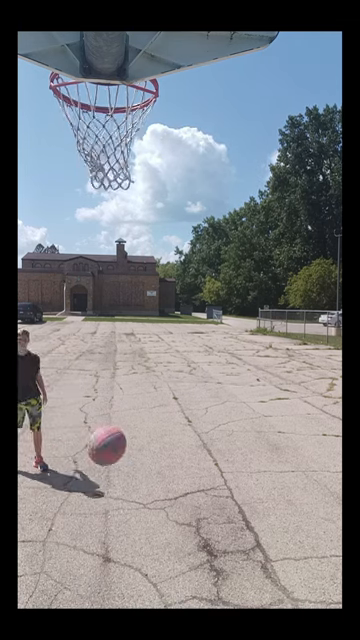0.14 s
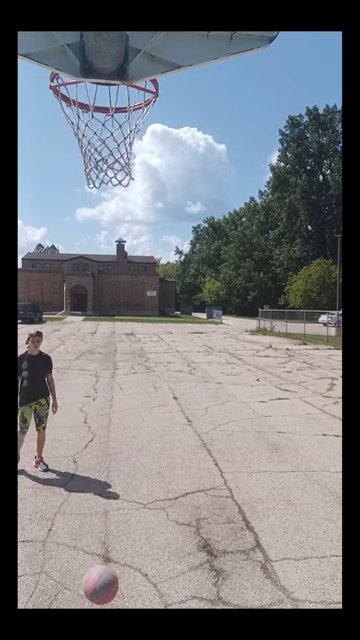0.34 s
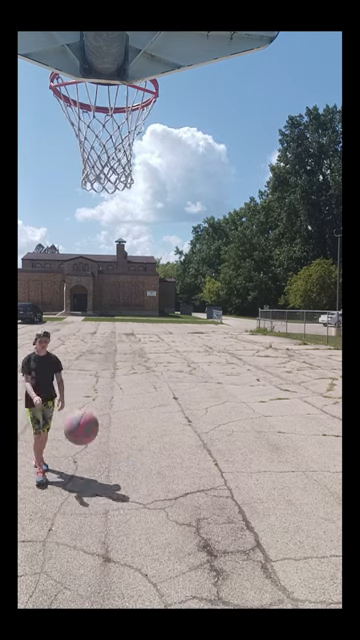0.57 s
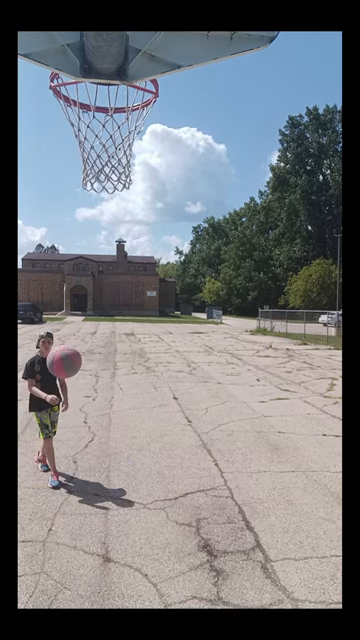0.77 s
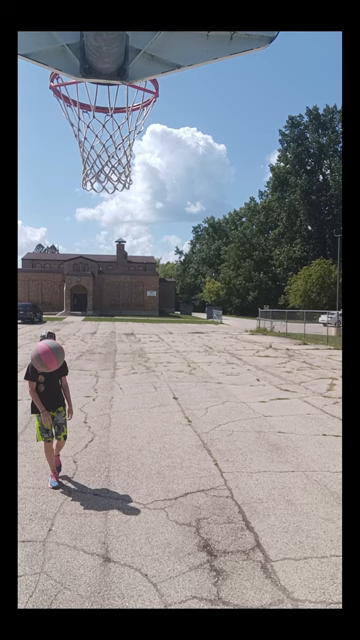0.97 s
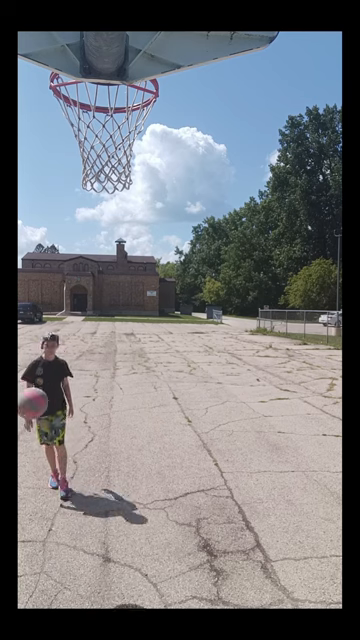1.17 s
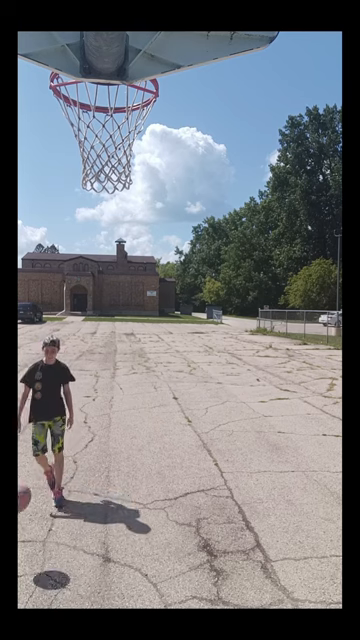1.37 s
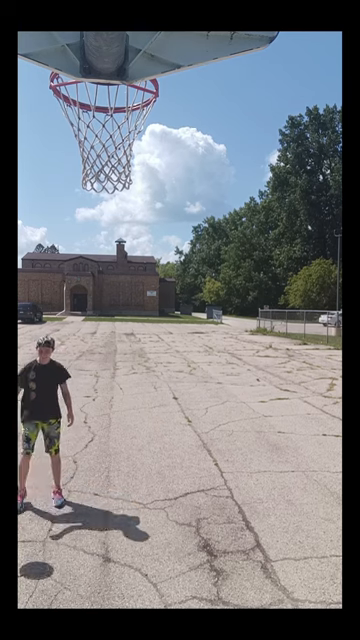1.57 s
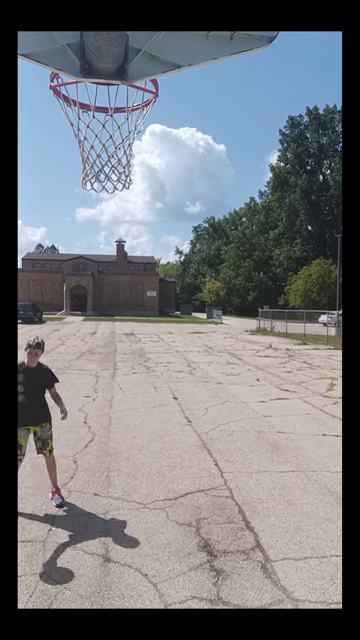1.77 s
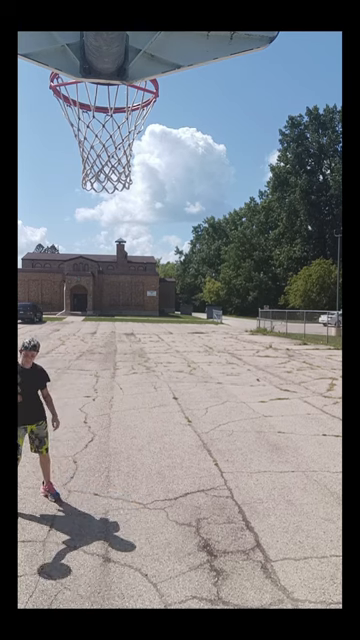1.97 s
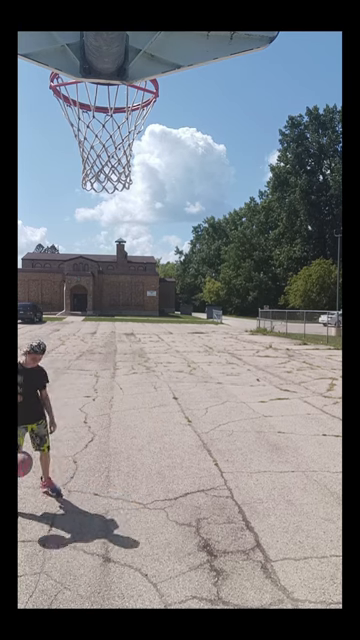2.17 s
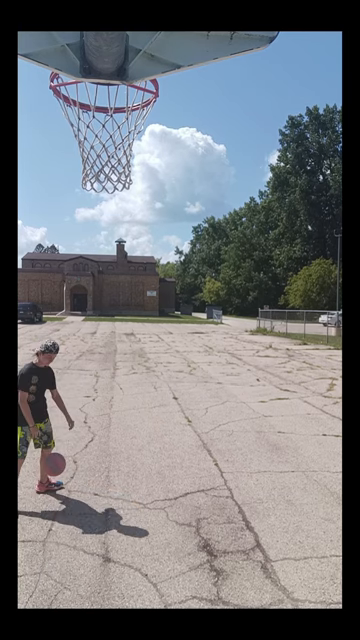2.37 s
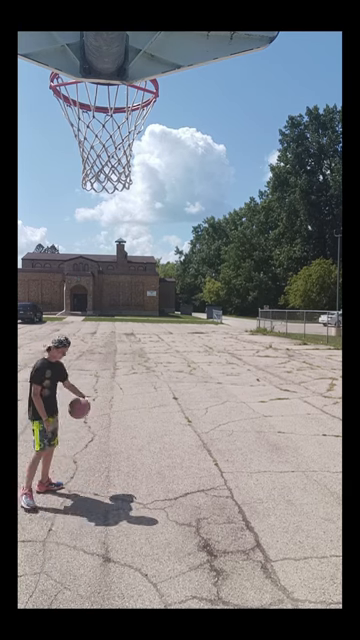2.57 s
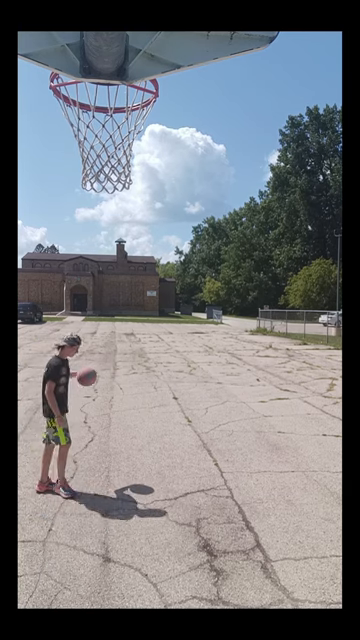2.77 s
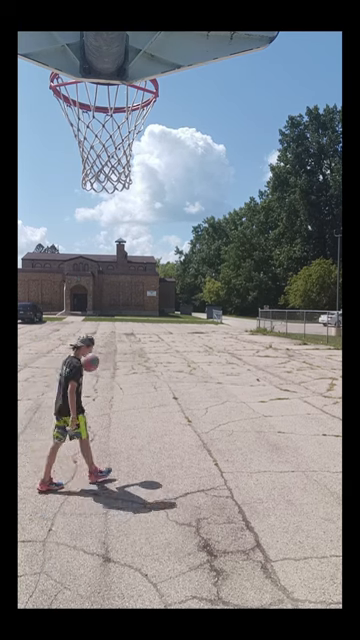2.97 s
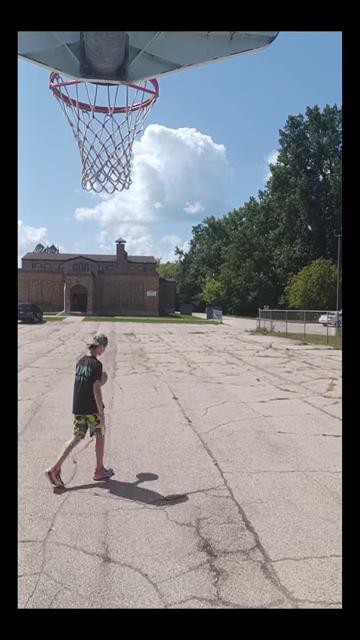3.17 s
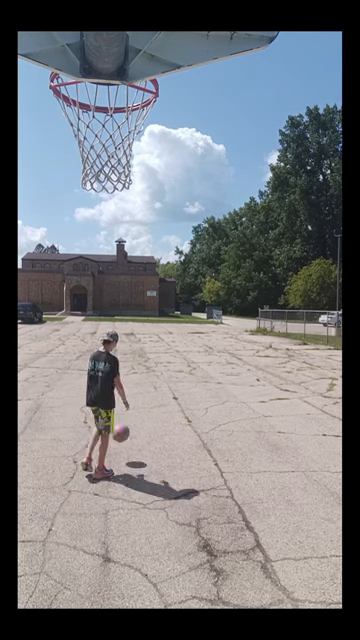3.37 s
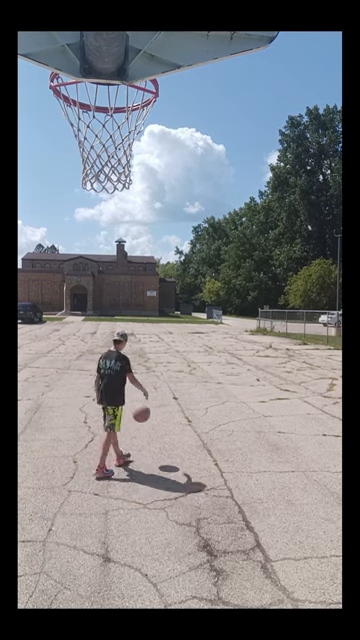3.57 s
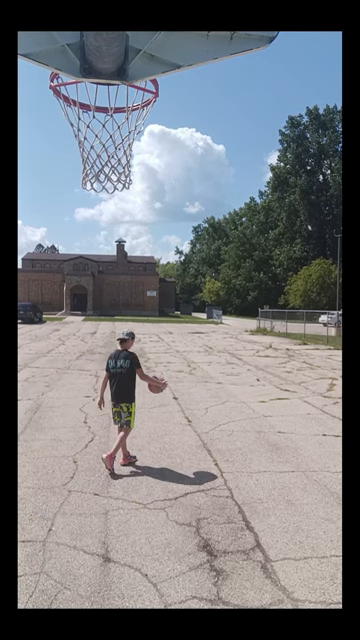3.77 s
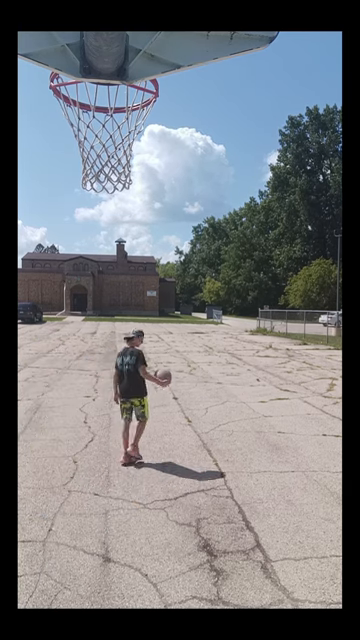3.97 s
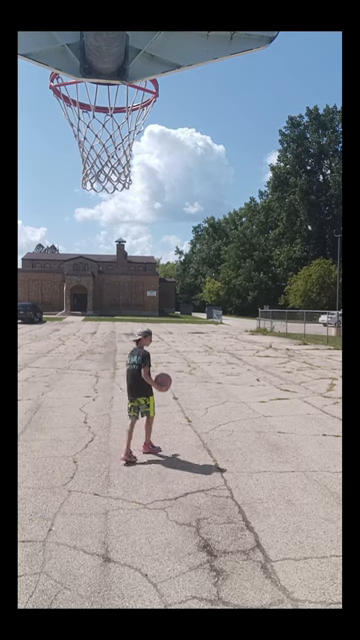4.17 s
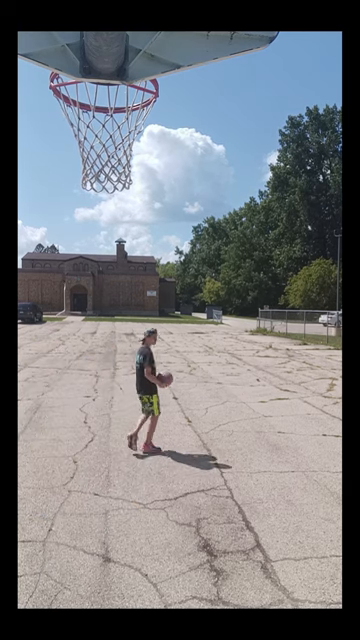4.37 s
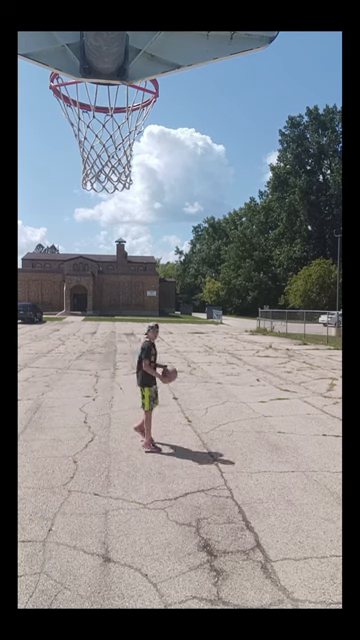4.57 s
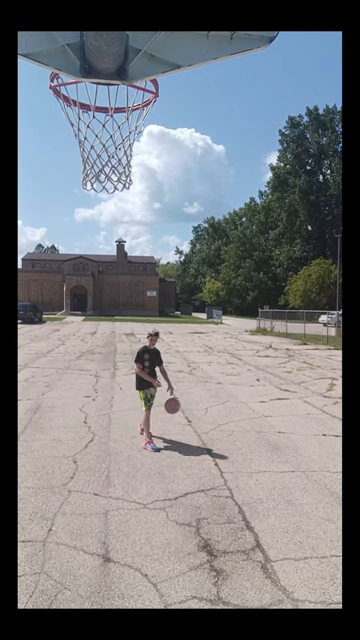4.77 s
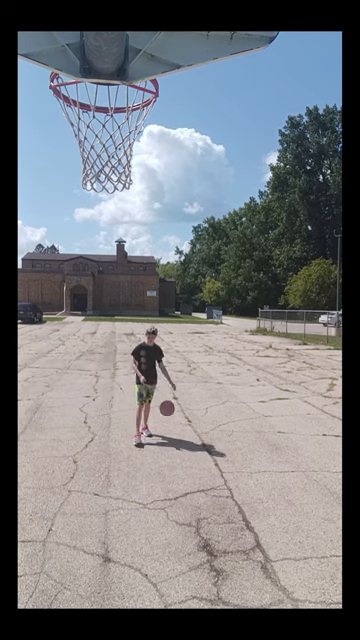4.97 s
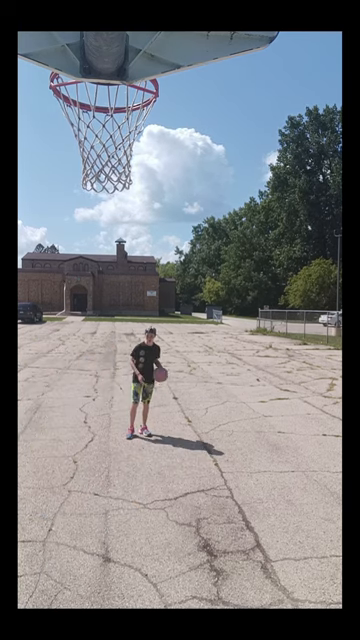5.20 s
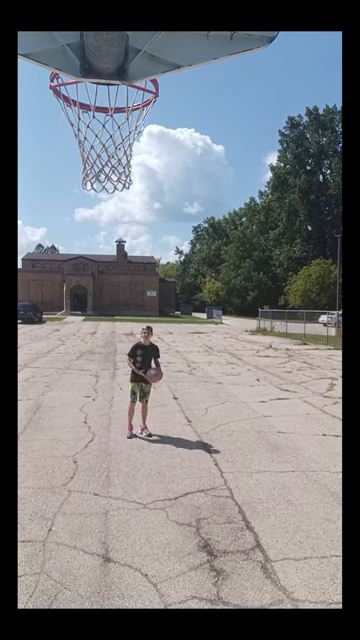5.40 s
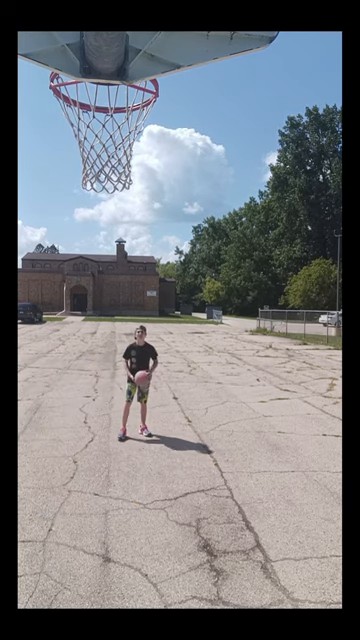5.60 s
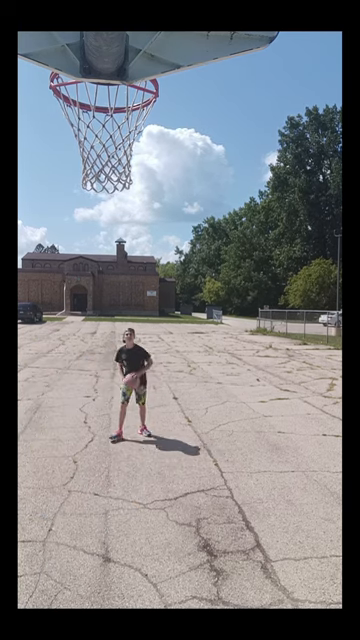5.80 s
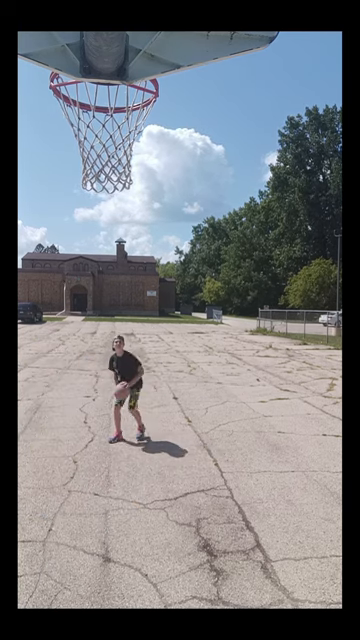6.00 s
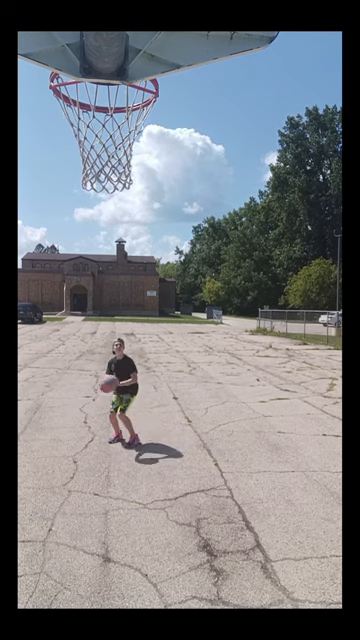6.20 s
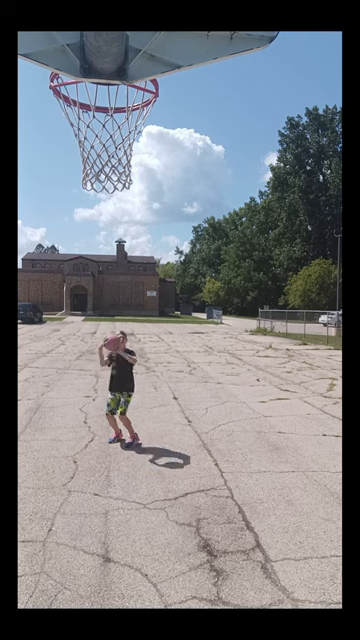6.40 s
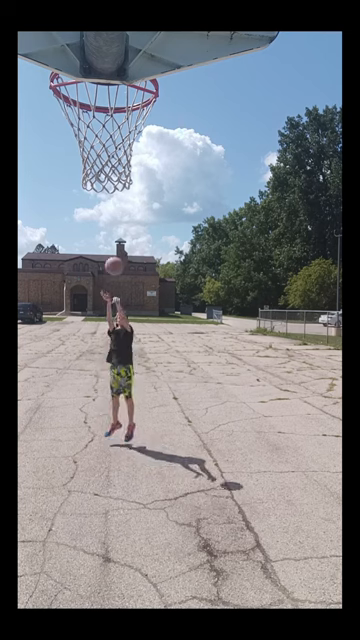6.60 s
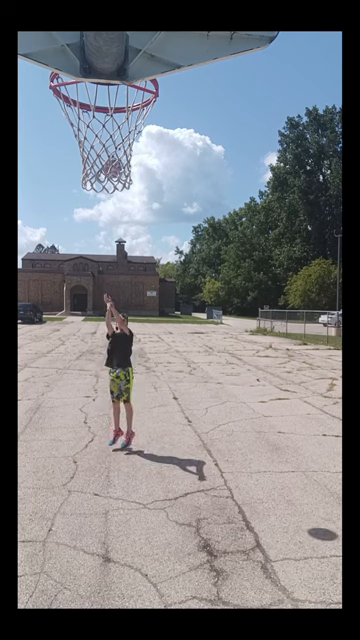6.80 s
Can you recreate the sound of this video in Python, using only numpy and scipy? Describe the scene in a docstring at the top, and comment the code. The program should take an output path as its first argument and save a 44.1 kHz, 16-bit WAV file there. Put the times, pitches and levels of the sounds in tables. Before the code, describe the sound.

An outdoor asphalt court heard in stereo from under the hoop, with far low rumble and a high hiss that slowly thins. At 0.2 s a basketball lands with a hard rubbery slap, short low thump, and scattered echoes from pavement, trees and a distant building; a thin fading ring follows. Heavy wind bursts batter the left side around 0.5-0.6 s and 1.1 s. A scuff precedes the second bounce at 1.4 s, and a tick and scrape follow near 1.55 s. The third, strongest bounce hits at 2.2 s; wind thuds at 2.6-2.7 s. A softer bounce comes at 3.4 s, a dull hand knock at 4.3 s, gritty steps around 4.5-5.1 s, and the fifth bounce at 4.8 s. Gusts return near 6 s with a sharp scuff and tiny sole squeak at 6.07 s, then a quick double knock with ticks at 6.8 s.

```python
"""A basketball bounces five times on an open asphalt court, heard from under the hoop: each bounce
slaps the ringing rubber shell, thumps, and draws an answer from the yard, trees and a far building.
Damped noise gives dull knocks, mostly hands on the ball; shoes scuff grit, tick, and squeak by stick and slip.
Eddies swept past the two microphone ports buffet them, over shaped noise: a distant rumble and a high hiss."""
import sys
import numpy as np
from scipy import signal
from scipy.fft import rfft, irfft, next_fast_len
from scipy.io import wavfile
from scipy.ndimage import uniform_filter1d, map_coordinates

SR = 44100
rng = np.random.default_rng(int(sys.argv[2]) if len(sys.argv) > 2 else 0)


def wrap_up_sound(samples):
    """Save the sound to the file named by the first command line argument, as 16-bit audio."""
    columns = np.atleast_2d(samples).T
    # keep every value between -1 and 1, then stretch to whole-number steps
    tamed = np.clip(columns, -1, 1)
    steps = np.round(tamed * 32767).astype(np.int16)
    wavfile.write(sys.argv[1], SR, steps)


N = 302092

# crunch of grit under a sole: frequency_hz, density_db (relative, per Hz)
GRIT_SPECTRUM = [(300, -23), (900, -4), (1600, 3), (2400, 5), (3200, 5), (4200, -0.5), (6000, -3),
                 (9000, -14), (15000, -15.5)]
# turbulence: knots per second of the fast flutter in the wind's level and pitch
FLUTTER_PER_S = 105


def amp(db):
    """Decibels to gain."""
    return 10 ** (np.asarray(db) / 20)


def unit(x):
    """x at rms 1."""
    return x / np.sqrt(np.mean(x ** 2) + 1e-20)


def along(points, hz):
    """(Hz, value) points read on a log axis."""
    f, v = np.transpose(points)
    return np.interp(np.log(hz + 1), np.log(f + 1), v)


def curve(rows, order=1):
    """One column of (s, ..) rows as a value per sample."""
    columns = np.transpose(rows)
    return np.interp(np.arange(N) / SR, columns[0], columns[order])


def filtered(x, response):
    """x times a complex response of frequency."""
    n = x.shape[-1]
    m = next_fast_len(n + SR // 10, True)
    return irfft(rfft(x, m) * response(np.fft.rfftfreq(m, 1 / SR)), m)[..., :n]


def causal(db):
    """The minimum-phase response with these gains."""
    cepstrum = irfft(db * np.log(10) / 20)
    half = len(cepstrum) // 2
    cepstrum[1:half] *= 2
    cepstrum[half + 1:] = 0
    return np.exp(rfft(cepstrum))


def resonance(f, hz, width):
    """One damped mode, gain 1 at its centre."""
    return 1j * f * width / (hz * hz - f * f + 1j * f * width)


def treble(f, db, corner_hz=2600):
    """A shelf that lifts the highs by db."""
    return 1 + (amp(db) - 1) * f ** 2 / (f ** 2 + corner_hz ** 2)


def wobble(rate):
    """A random curve with rate knots a second, repeating after 2048 knots."""
    return map_coordinates(rng.standard_normal(2048), [np.arange(N) * rate / SR], mode="wrap")


def brief(t, length_s):
    """An envelope that holds for about length_s and then stops quickly."""
    return np.exp(-np.square(np.square(t / length_s)))


def held(t, length_s, rise_s, fall_s):
    """An envelope that rises around t = 0, holds for length_s and falls away."""
    return (1 + np.tanh(t / rise_s)) * (1 - np.tanh((t - length_s) / fall_s)) / 4


def specks(shape, per_s=700, bed_db=-7):
    """Scattered impulses of random size on a bed of weaker ones."""
    sparse = rng.standard_normal(shape) * (rng.random(shape) < per_s / SR)
    return unit(unit(sparse) + amp(bed_db) * rng.standard_normal(shape))


def add(track, s, sound):
    """Mix a sound into a track at time s."""
    start = round(s * SR)
    track[..., start:start + sound.shape[-1]] += sound[..., :N - start]


def at_ports(x, s, lag_s=0.000592, lag_growth_s_per_s=0.000036):
    """The right port hears the court first, by more as the player works his way across it."""
    lag = lag_s + lag_growth_s_per_s * s
    return filtered(x, lambda f: np.exp(1j * np.pi * f * lag * np.array([[-1], [1]])))


def noise(spectrum, patchy_db):
    """Unrelated noise of rms 1 in both channels, with shared narrow drifting patches of gain."""
    z = signal.stft(rng.standard_normal((2, N)), nperseg=1024)[2]
    field = uniform_filter1d(rng.standard_normal(z.shape[1:]), size=4, axis=0)
    field = uniform_filter1d(field, size=22, axis=1)
    patchy = signal.istft(z * amp(patchy_db * unit(field)), nperseg=1024)[1][:, :N]
    return unit(filtered(patchy, lambda f: amp(along(spectrum, f))))


def background(hiss_db=2, distance_db=-57.5, drift_db=.5):
    """High hiss and the far rumble of the neighbourhood, each drifting a little in level."""
    # high hiss: frequency_hz, density_db (relative, per Hz)
    hiss_spectrum = [(1500, -6.5), (3000, -4.5), (5000, 0), (7000, 4.5), (8300, 5.5), (10400, 0.5),
                     (12000, -10.5), (13500, -23), (16000, -33.5)]
    # far traffic and trees: frequency_hz, density_db (relative, per Hz)
    distance_spectrum = [(30, 9.5), (200, -9), (350, -1), (520, -25), (720, -1.5), (950, -3), (1400, -9.5),
                         (2200, -15), (4000, -17), (8000, -53), (14000, -54)]
    # slow course of the hiss: time_s, level_db (before hiss_db and the drift)
    hiss_level = [(0, -49.5), (.3, -49.5), (1.9, -53.5), (4.6, -55.5), (5.8, -58.5), (6.85, -56)]
    hiss = noise(hiss_spectrum, patchy_db=2.8)
    distance = amp(distance_db + drift_db * wobble(13.0)) * noise(distance_spectrum, patchy_db=5.0)
    return amp(curve(hiss_level) + hiss_db + drift_db * wobble(4.3)) * hiss + distance


def buffet(level_db, shift, octaves_per_db=0.0532, moderate_db=-23, gain_db=1, flicker_octaves=.13):
    """Wind sweeps a pattern of eddies past one port: the faster it goes, the louder and higher they sound."""
    # eddies in a moderate gust: frequency_hz (at speed 1), density_db (relative, per Hz)
    eddy_spectrum = [(12, -28), (25, -26), (45, 4), (75, 1.5), (115, 1), (170, -5), (250, -12.5),
                     (370, -25), (540, -47.5), (800, -73), (1500, -60), (4000, -110)]
    octaves = octaves_per_db * (level_db - moderate_db) + shift
    speed = 2 ** (octaves + flicker_octaves * wobble(FLUTTER_PER_S))
    travel = np.cumsum(speed)
    pattern = filtered(rng.standard_normal(2 * N), lambda f: amp(along(eddy_spectrum, f)))
    eddies = map_coordinates(pattern, [travel], mode="wrap")
    # level the swept pattern, so that level_db alone sets the loudness
    power = uniform_filter1d(uniform_filter1d(eddies ** 2, size=1100), size=700)
    even = eddies / np.sqrt(np.abs(power) + 1e-20)
    return amp(uniform_filter1d(level_db, size=300) + gain_db) * even


def wind_at(port, breeze_db, breeze_octaves=-.1, rise_s=0.00433, fall_s=0.0111,
            skirt_db=-15, skirt_rise_s=.025, skirt_fall_s=.04,
            swell_db=1.44, swell_per_s=16, flutter_db=2.5):
    """Gusts ride on the breeze at one port; the strongest dominates the pitch, and turbulence shakes the sum."""
    # gusts that strike one port; small eddies sound higher. Levels precede turbulence and buffet gain:
    # start_s, length_s, level_db, pitch_shift_octaves, port
    gust_rows = [(0, 0.23, -24, 0.17, "left"), (0.076, 0.048, -23.5, 0.43, "right"),
                 (0.161, 0.014, -21.5, 0.36, "right"), (0.509, 0.019, -21, -0.026, "left"),
                 (0.522, 0.028, -9, 0.45, "left"), (0.569, 0.022, -10, 0.26, "left"),
                 (0.638, 0.14, -22.5, 0.12, "left"), (0.704, 0.013, -16.5, -0.13, "left"),
                 (0.826, 0.058, -22, -0.26, "left"), (0.916, 0.073, -17, -0.057, "left"),
                 (1.069, 0.037, -10.5, -0.35, "left"), (1.125, 0.053, -12.5, 0.26, "left"),
                 (1.227, .11, -21, -0.18, "left"), (1.686, 0.18, -26, -0.19, "right"),
                 (1.778, 0.034, -20, -0.0033, "left"), (1.909, 0.16, -23, -0.039, "left"),
                 (2.304, 0.062, -21, -0.21, "right"), (2.574, 0.07, -17.5, 0.13, "left"),
                 (2.63, .11, -19, 0.35, "left"), (2.734, 0.033, -17, -0.0061, "left"),
                 (2.764, 0.036, -14.5, 0.19, "left"), (2.819, 0.094, -24.5, 0.046, "left"),
                 (2.922, 0.06, -19, -0.043, "left"), (3.156, 0.021, -15.5, -0.12, "left"),
                 (3.757, 0.06, -25.5, 0.15, "left"), (4.053, 0.047, -19.5, -0.12, "left"),
                 (5.207, 0.079, -15.5, -0.16, "left"), (5.266, 0.015, -15, 0.32, "left"),
                 (5.558, 0.048, -22.5, 0.0044, "right"), (5.799, 0.038, -20.5, -0.16, "right"),
                 (5.82, 0.48, -20.5, -0.075, "left"), (5.938, 0.072, -13, -0.41, "left"),
                 (5.889, 0.048, -18, 0.046, "left"), (6.089, 0.025, -13.5, 0.22, "left"),
                 (6.14, 0.026, -13.5, 0.28, "left"), (6.494, 0.046, -26.5, 0.17, "left"),
                 (6.343, 0.036, -14.5, 0.063, "left"), (6.567, 0.09, -19, -0.18, "right"),
                 (6.699, 0.016, -13.5, 0.36, "left"), (6.734, 0.021, -14.5, 0.34, "left"),
                 (6.737, 0.15, -26, -0.055, "right"), (6.804, 0.083, -20, -0.3, "left")]
    t, power = np.arange(N) / SR, amp(breeze_db) ** 2
    shift = breeze_octaves * power
    for s, length, db, octaves, side in gust_rows:
        if side == port:
            near = np.abs(t - s - length / 2) < length / 2 + .1
            since = t[near] - s
            gust = (amp(db) * held(since, length, rise_s, fall_s)) ** 2
            # a weaker, slower swell of air before and after the gust
            skirt_length = length + skirt_rise_s + skirt_fall_s
            skirt = held(since + skirt_rise_s, skirt_length, skirt_rise_s, skirt_fall_s)
            power[near] += gust + (amp(db + skirt_db) * skirt) ** 2
            shift[near] += octaves * gust
    swell = swell_db * np.tanh(wobble(swell_per_s))
    flutter = flutter_db * np.tanh(wobble(FLUTTER_PER_S))
    return buffet(10 * np.log10(power) + swell + flutter, shift / power)


def wind(limit=.8):
    """Each port has its own turbulence, rounded off at the peaks; the windward left one takes most of the gusts."""
    # light breeze between gusts, before turbulence and buffet gain: time_s, left_level_db, right_level_db
    breeze = [(0, -28, -26), (.4, -37, -30), (.8, -27, -32), (1.55, -33, -33), (2.1, -27, -28.5),
              (2.8, -27, -30.5), (3.4, -33, -32), (4.25, -39, -36), (4.75, -42, -39), (5.5, -35.5, -37),
              (6.15, -30, -27.5), (6.85, -32, -28)]
    left = wind_at("left", curve(breeze, order=1))
    right = wind_at("right", curve(breeze, order=2))
    return limit * np.tanh(np.array([left, right]) / limit)


def thuds(width_s=0.00099, suction_ratio=2.65):
    """A tight eddy slams into the left port: one push of pressure inside a wider, weaker suction."""
    # slams: centre_s, peak_db (full scale 0, ahead of the port's colour)
    slams = [(.077, -10), (0.5294, -4), (0.5454, -4), (.5715, -3.5), (.578, -5.5), (1.143, -9.5),
             (2.621, -0.5), (2.671, -10.5), (2.695, -9.5), (2.72, -12), (3.17, -9), (5.736, -19.5),
             (5.982, -5.5), (6.11, -5.5), (6.201, -13)]
    out, t = np.zeros((2, N)), np.arange(-SR // 50, SR // 50) / SR
    pressure = np.cosh(t / width_s) ** -2
    suction = np.cosh(t / width_s / suction_ratio) ** -2 / suction_ratio
    push = pressure - suction
    for s, db in slams:
        add(out[0], s + t[0], amp(db) * push / push.max())
    return out


def squeak(start_s=6.068, length_s=0.025, pitch_hz=2580, level_db=-39, rough=0.028, overtone_db=-11):
    """A planted rubber sole sticks and slips at an unsteady rate: a rough chirp with weak overtones."""
    t = np.arange(N) / SR - start_s
    phase = 2 * np.pi * np.cumsum(pitch_hz * (1 + rough * wobble(820))) / SR
    tone = sum(amp(k * overtone_db) * np.sin((k + 1) * phase) for k in range(3))
    chirp = amp(level_db) * unit(tone) * held(t, length_s, rise_s=0.0019, fall_s=0.0083)
    return at_ports(chirp, start_s)


def ticks(width_share=0.13, crack_db=-17, snap_s=0.0018, pan_db=3):
    """Short ticks of heel, grit and hand: a broad crack with a brief ring at its own pitch."""
    # single ticks: start_s, level_db (before the pan), pitch_hz
    tick_rows = [(1.557, -26, 2590), (4.5505, -33.5, 2632), (4.5982, -41, 2562), (4.6178, -38.5, 3793),
                 (4.6952, -44, 3916), (4.9895, -40.5, 2463), (5.0214, -42, 2570), (5.1263, -38.5, 2703),
                 (6.789, -41, 3902), (6.8024, -39, 6570)]
    out, t = np.zeros((2, N)), np.arange(SR // 20) / SR
    push = t / snap_s * np.exp(1 - t / snap_s)
    for s, db, hz in tick_rows:
        colour = lambda f: resonance(f, hz, width_share * hz) + amp(crack_db + along(GRIT_SPECTRUM, f))
        snap = filtered(push * rng.standard_normal(len(t)), colour)
        add(out, s, at_ports(amp(db) * snap * np.linalg.norm(push) / np.linalg.norm(snap), s))
    return out * amp([[pan_db], [-pan_db]])


def scuffs(grain_db=4, stutter_db=1, rise_s=0.0067, fall_s=0.022, fade_db=3, pan_db=3.5):
    """A sole scrapes over loose grit: a dense run of tiny grains, each with its own size and pitch."""
    # dragging soles: start_s, level_db (before stutter, fade and pan), length_s, half_treble_lift_db
    drags = [(1.156, -48.5, 0.047, 2), (1.555, -39, 0.04, 2), (3.874, -62, 0.028, 18),
             (4.543, -46.5, 0.07, -7), (4.605, -44.5, 0.068, 10.5), (4.967, -50, 0.063, 27),
             (4.988, -43, 0.13, 0), (5.069, -46, 0.11, -5), (6.071, -31.5, 0.023, 1),
             (6.413, -54, 0.026, 17), (6.799, -47, 0.046, 2)]
    out, t = np.zeros((2, N)), np.arange(-SR // 25, SR // 4) / SR
    for s, db, length, half_lift_db in drags:
        z = signal.stft(specks(len(t)), nperseg=128)[2]
        sizes = unit(uniform_filter1d(rng.standard_normal(z.shape), size=4, axis=0))
        crunch = signal.istft(z * amp(grain_db * sizes), nperseg=128)[1][:len(t)]
        colour = lambda f: amp(along(GRIT_SPECTRUM, f)) * treble(f, 2 * half_lift_db, corner_hz=6650)
        grains = filtered(crunch, colour)
        stutter = stutter_db * unit(uniform_filter1d(rng.standard_normal(len(t)), size=400))
        drag = amp(db + stutter - fade_db * t / length) * held(t, length, rise_s, fall_s)
        add(out, s + t[0], at_ports(drag * unit(grains), s))
    return out * amp([[pan_db], [-pan_db]])


def knocks(width_share=0.28, gain_db=7, soft_hz=1600):
    """Short dull knocks of damped noise: hands on the ball, and at 2.617 s the upper edge of a wind thud."""
    # knocks: start_s, level_db (before gain_db), pitch_hz, burst_t60_s
    knock_rows = [(2.617, -34, 1200, 0.02), (4.2766, -23, 1201, 0.039), (4.283, -22, 429.9, 0.1),
                  (6.789, -13.5, 1291, 0.021), (6.801, -22, 1520, 0.076), (6.825, -32, 1340, .025)]
    out, t = np.zeros((2, N)), np.arange(SR // 10) / SR
    for s, db, hz, t60 in knock_rows:
        burst = amp(-60 * t / t60) * rng.standard_normal(len(t))
        knock = filtered(burst, lambda f: resonance(f, hz, width_share * hz) / (1 + 1j * f / soft_hz) ** 2)
        add(out, s, at_ports(amp(db + gain_db) * knock / np.linalg.norm(knock), s))
    return out


def singing(spin_hz=8, spin_db=2.0, fade_db_per_s=25, rise_s=0.011, fall_s=0.025, waver=0.0054):
    """After a bounce the air in the flying ball sings a thin tone, wavering with its spin as it fades."""
    # air modes: start_s, length_s, pitch_hz, level_db (at the start, before the spin)
    tones = [(0.3, 0.25, 2213, -44.5), (0.338, .18, 883, -60), (3.544, 0.04, 2961, -59),
             (3.67, 0.15, 2961, -60)]
    out, t = np.zeros((2, N)), np.arange(-SR // 20, SR // 2) / SR
    for s, length, hz, db in tones:
        spin = spin_db * np.sin(2 * np.pi * spin_hz * t)
        level = amp(db - fade_db_per_s * t + spin) * held(t, length, rise_s, fall_s)
        phase = 2 * np.pi * np.cumsum(hz * (1 + waver * wobble(76)[:len(t)])) / SR
        add(out, s + t[0], at_ports(level * np.sin(phase), s))
    return out


def yard(x, echo_s, near_db=-23, swell_s=0.022, trees_s=0.04, trees_db=-29, trees_t60=0.34,
         trees_onset_s=0.0093, far_db=-33, far_t60=0.23, far_onset_s=.004, air_db=9, grain_db=3, patchy_db=4):
    """Uneven scatter from the pavement swells and dies; the nearest trees and a far building return soft echoes."""
    # decay of the pavement scatter: frequency_hz, t60_s
    decay = [(200, 0.46), (1200, 0.52), (3000, 0.5), (7000, 0.53), (14000, 0.11)]
    hz, t, z = signal.stft(specks((2, len(x)), per_s=2500), SR, nperseg=256)
    field = uniform_filter1d(rng.standard_normal(z.shape[1:]), size=2, axis=0)
    patches = unit(uniform_filter1d(field, size=10, axis=1))
    z = z * amp(grain_db * rng.standard_normal(len(t)) + patchy_db * np.tanh(patches))

    def echo(s, t60, onset_s):
        return (1 + np.tanh((t - s) / onset_s)) * amp(-60 * np.abs(t - s) / t60)

    scatter = (1 - np.exp(-t / swell_s)) * amp(-60 * t / along(decay, hz)[:, None])
    trees = echo(trees_s, trees_t60, trees_onset_s)
    building = echo(echo_s, far_t60, far_onset_s)
    tail = 0
    for db, shape in ((near_db, scatter), (trees_db, trees), (far_db, building)):
        path = signal.istft(z * shape, SR, nperseg=256)[1]
        tail = tail + amp(db) * path / np.linalg.norm(path[0])
    # the treble leaves the contact along the ground, so more of it reaches the surroundings
    bright = filtered(x, lambda f: treble(f, air_db, corner_hz=4000))
    return signal.fftconvolve(bright[None], tail, axes=1)[:, :len(x)]


def shell(f, least_loss=0.075):
    """Response of the ball's skin to a blow: rubber damps every mode, so each is broad and short."""
    # shell modes: frequency_hz, width_hz (at least least_loss of the frequency), level_db
    modes = [(330, 365, -4), (603, 220, -13), (876, 85, -2.5), (1156, 162, 0), (1454, 126, -0.5),
             (1673, 194, -0.5), (2370, 420, -7), (2885, 590, -11.5), (3910, 293, -6.5), (4750, 3300, -17),
             (6680, 2660, -14)]
    total = 0
    for k, (hz, width, db) in enumerate(modes):
        sign = (-1) ** (k // 2)
        total = total + sign * amp(db) * resonance(f, hz, max(width, least_loss * hz))
    return total


def spot(f, lifts, depth=1, least_width_hz=70, width_share=0.082):
    """Colour given by the spot that lands: narrow lifts and gaps in the shell's ring."""
    gains = [1 + (amp(depth * db) - 1) * resonance(f, hz, least_width_hz + width_share * hz)
             for hz, db in lifts]
    return np.prod(gains, axis=0)


def bounces(blow_db=22, crunch_db=-25, crunch_s=0.0058, crunch_hz=4000, contact_s=0.011, release_db=-5,
            release_hz=1100, shiver_hz=1500, shiver_width_hz=1600, shiver_db=-28.5, shiver_t60=0.046,
            thump_hz=98, thump_s=0.0127, ping_swell_s=0.043, pan_db=2.0):
    """The skin slaps and crunches on the ground, the ball squashes with a low thump, then lets go with a duller flap."""
    # ball on asphalt; the spot that lands favours some pitches of the shell and misses others:
    # start_s, slap_level_db (before blow_db and pan), treble_lift_db, thump_level_db (before pan),
    # room_db, far_echo_s, lifts [(pitch_hz, lift_db), ..]
    landings = [(0.234, -3.5, -3, -15.5, -1.5, 0.31, [(650, 7), (970, 7.5), (1120, -15), (1600, 8.5),
                (2070, -14), (2600, 10.5), (3890, -9), (4600, 7)]),
                (1.3925, -4, 3, -17, -2, 0.27, [(700, -13), (780, 11), (1600, 5.5), (1870, -0.5),
                (2400, -7), (6350, -14)]), (2.2223, 0, -2, -14, -8, 0.27, [(670, 3), (1090, 10),
                (1380, -7.5), (2280, 2), (2950, 6.5), (4240, -16), (4730, 5.5), (5420, -17)]),
                (3.3661, -14.5, 8.5, -18.5, -4, .281, [(400, 16.5), (610, -17), (750, 9), (1310, 13),
                (1880, 2.5), (2830, 21)]), (4.8152, -5, 5.5, -14, -6.5, 0.27, [(570, 7.5), (1010, 6.5),
                (1360, 6.5), (1640, 3.5), (2130, 6.5), (3460, -12.5), (5090, -12)])]
    # the air inside the ball rings on faintly: pitch_hz, level_db (before its swell), t60_s
    cavity = [(883, -57.5, 0.7), (1620, -55, 0.392), (2213, -69, 0.38), (2961, -58, 0.95)]
    out, t = np.zeros((2, N)), np.arange(SR * 3 // 4) / SR
    lead = SR // 100  # samples of silence ahead of the blow
    release = lambda f: 1 + amp(release_db) * np.exp(-2j * np.pi * f * contact_s) / (1 + 1j * f / release_hz)
    for s, db, bright_db, thump_db, room_db, echo_s, lifts in landings:
        grit = amp(crunch_db) * brief(t, crunch_s) * rng.standard_normal(len(t))
        crunch = filtered(grit, lambda f: 1j * f / (crunch_hz + 1j * f))
        # the skin keeps shivering for a moment
        shiver = amp(shiver_db - 60 * t / shiver_t60) * rng.standard_normal(len(t))
        shiver = filtered(shiver, lambda f: resonance(f, shiver_hz, shiver_width_hz))
        blow = -1. * (t == 0) + crunch + shiver
        ring = filtered(blow, lambda f: shell(f) * treble(f, bright_db) * release(f))
        slap = amp(db + blow_db) * ring
        thump = amp(thump_db) * np.sin(2 * np.pi * thump_hz * t) * brief(t, thump_s)
        # the direct sound carries the full colour of the spot; the yard keeps part of it
        direct = filtered(slap, lambda f: spot(f, lifts))
        around = unit(filtered(slap, lambda f: spot(f, lifts, depth=0.61))) * direct.std()
        near, spread = np.pad([direct + thump, around + thump], ((0, 0), (lead, 0)))
        panned = at_ports(near, s) * amp([[pan_db], [-pan_db]])
        add(out, s - lead / SR, panned + amp(room_db) * yard(spread, echo_s))
        # the enclosed air sings on as the ball flies back up
        ping = sum(amp(level - 60 * t / t60) * np.sin(2 * np.pi * hz * t) for hz, level, t60 in cavity)
        add(out, s, ping * (1 - np.exp(-t / ping_swell_s)))
    return out


def scene():
    """Background, wind, small court sounds and ball."""
    air = background() + wind() + thuds()
    small = squeak() + ticks() + scuffs() + knocks()
    return air + small + singing() + bounces()


def record(dry, top_hz=15700):
    """Each port colours its channel; the loudest peaks clip, and nothing passes above the band limit."""
    # each microphone port has its own resonance: frequency_hz, gain_db
    port_left = [(15, -16.5), (40, 3), (2000, -1.5), (4000, -1.5), (5500, -1), (7000, 2), (8400, 6.5),
                 (9300, -2.5), (10000, -17.5), (11000, -38.5), (13000, -19.5), (14500, -26)]
    port_right = [(15, -3), (45, 1), (1000, 2.5), (2000, 0), (4000, -1), (6000, -1.5), (8000, -9),
                  (9000, -2.5), (10400, 10), (11300, 8), (12000, 3), (14500, -2.5)]
    ported = filtered(dry, lambda f: np.array([causal(along(port, f)) for port in (port_left, port_right)]))
    return filtered(np.clip(ported, -1, 1), lambda f: f < top_hz)


dry = scene()
out = record(dry)
wrap_up_sound(out)
```